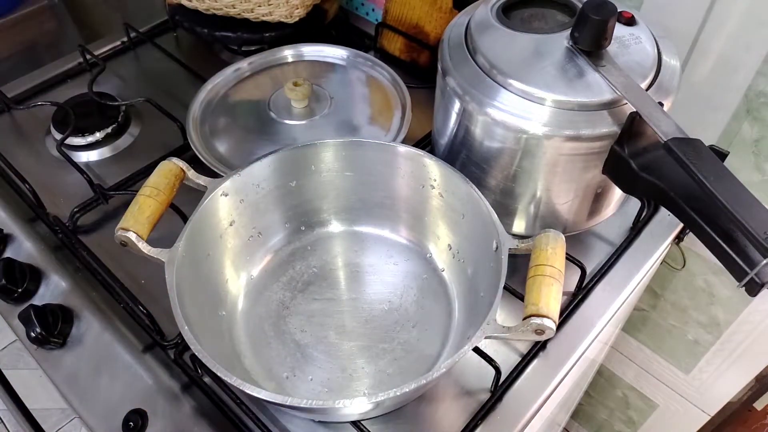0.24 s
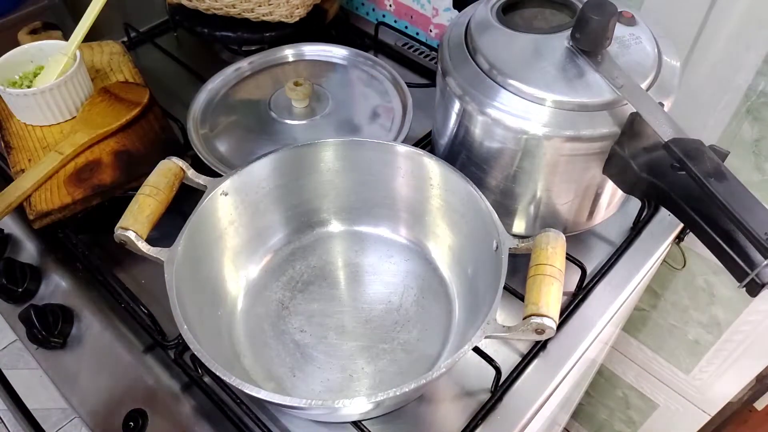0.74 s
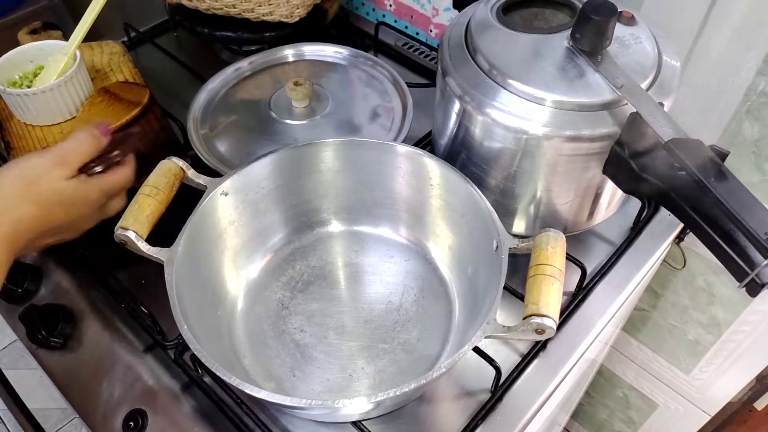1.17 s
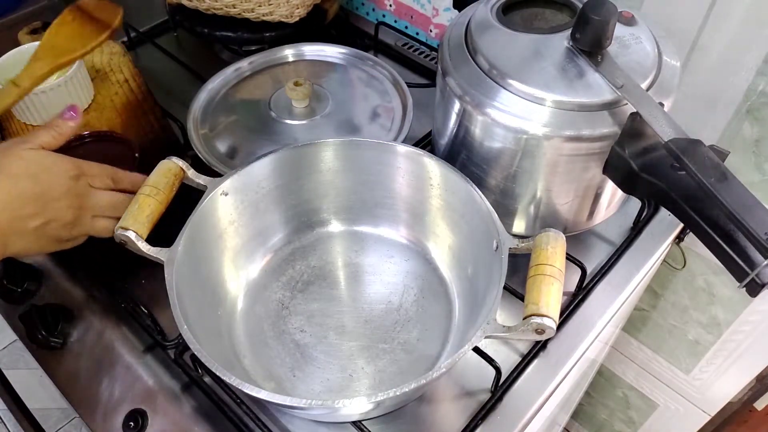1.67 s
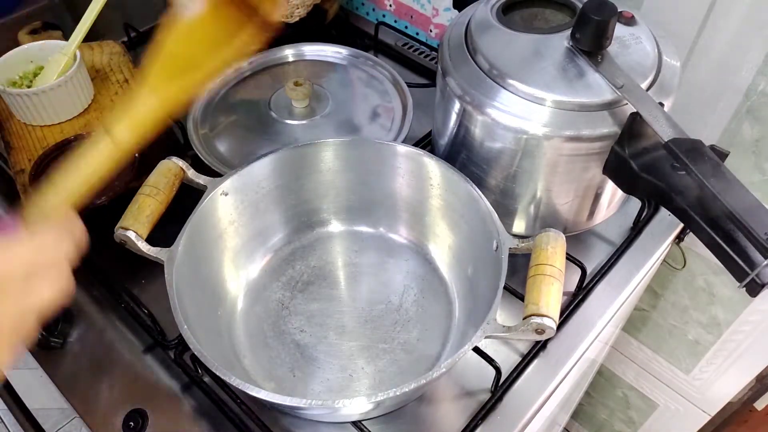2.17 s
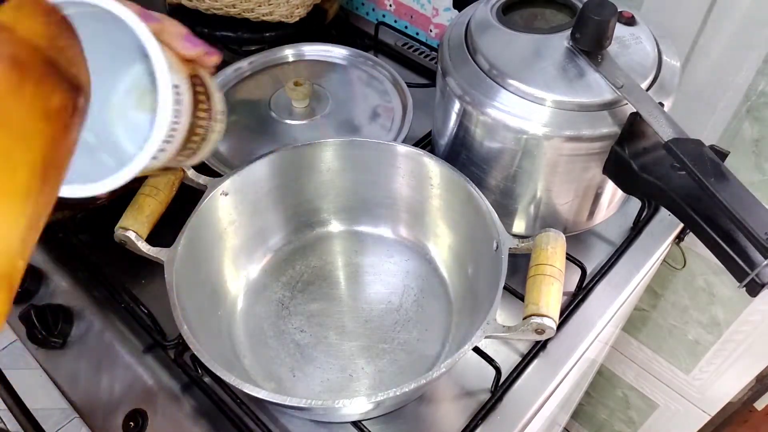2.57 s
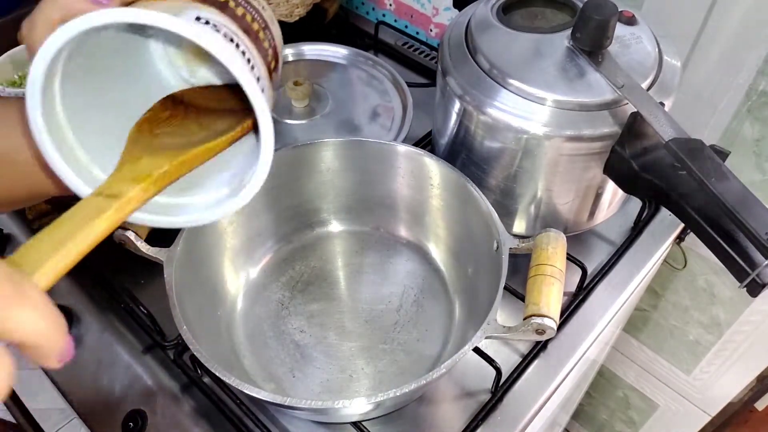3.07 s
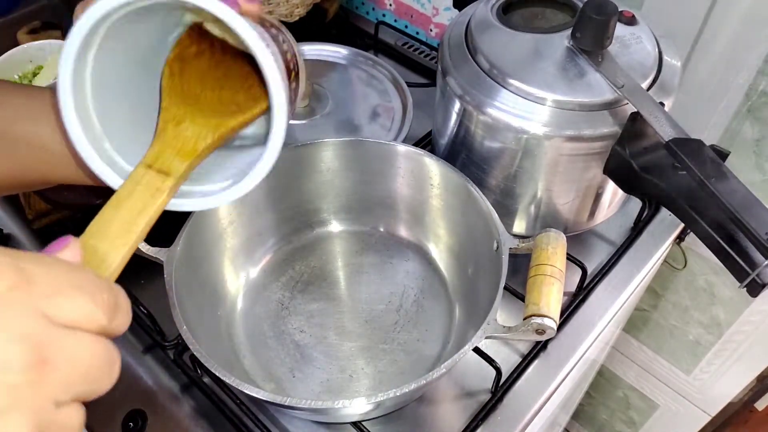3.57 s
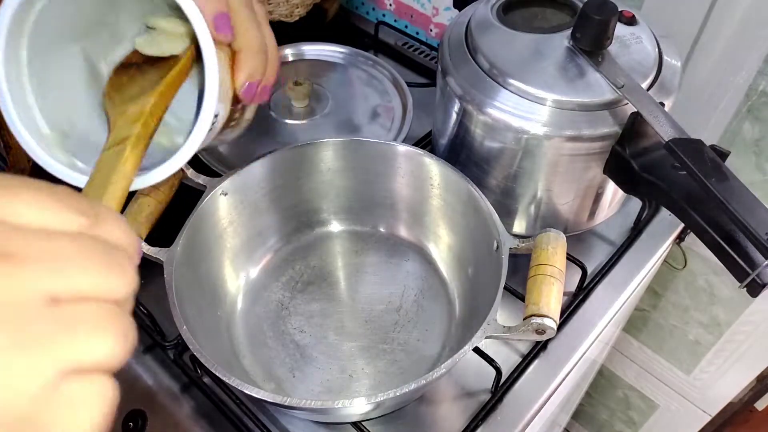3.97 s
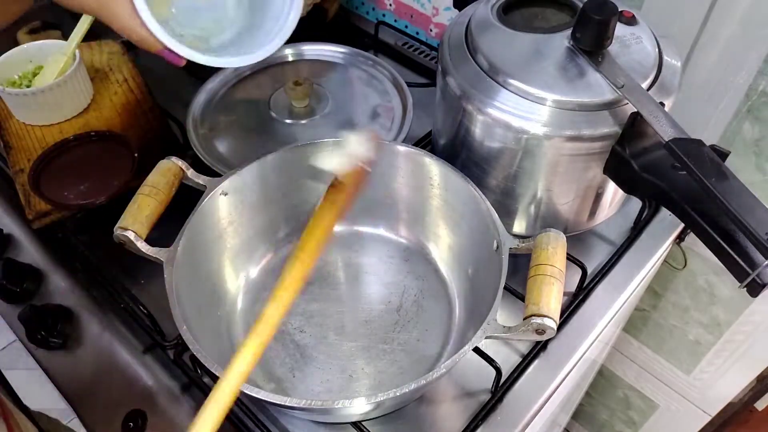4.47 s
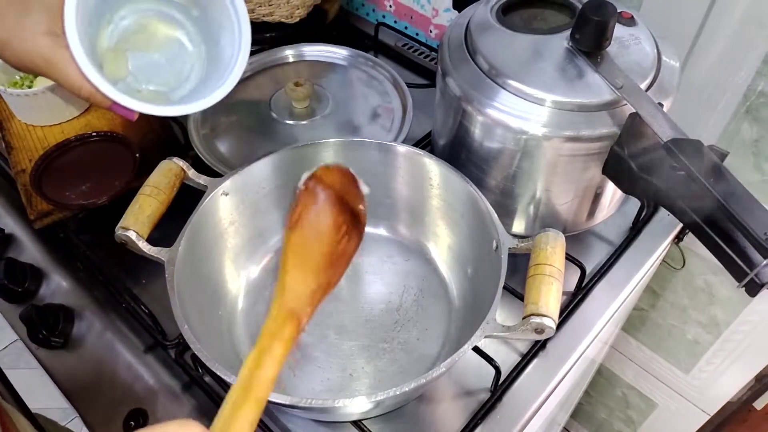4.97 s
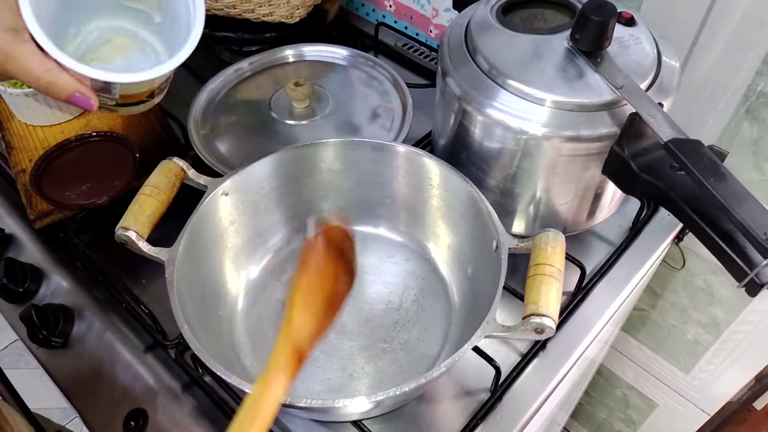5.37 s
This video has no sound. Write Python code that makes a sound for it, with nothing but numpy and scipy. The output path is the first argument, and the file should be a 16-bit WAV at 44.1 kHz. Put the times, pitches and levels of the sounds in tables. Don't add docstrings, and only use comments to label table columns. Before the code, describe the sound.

Steam roars from a cooker vent, drops out briefly, resumes quieter, with dull wooden scuffs and hollow spoon taps on a tub close by.

```python
import sys
import numpy as np
from scipy import signal
from scipy.fft import rfft, irfft, next_fast_len
from scipy.io import wavfile
from scipy.ndimage import uniform_filter1d, map_coordinates

SR = 44100
rng = np.random.default_rng(int(sys.argv[2]) if len(sys.argv) > 2 else 0)


def int16_out(signal):
    q = np.round(np.clip(np.atleast_2d(signal).T, -1, 1) * 32767)
    wavfile.write(sys.argv[1], SR, q.astype(np.int16))


def to_linear_factor(level_db):
    exponent = np.asarray(level_db, float) / 20
    return 10 ** exponent


N = 248265
CUT_S, BACK_S = 0.6025, 0.922


def unit(x):
    return x / np.sqrt(np.mean(x ** 2) + 1e-20)


def along(points, hz):
    f, v = np.transpose(points)
    return np.interp(np.log(hz + 1), np.log(f + 1), v)


def curve(points):
    s, v = np.transpose(points)
    return np.interp(np.arange(N) / SR, s, v)


def wobble(rate_hz):
    knots = rng.standard_normal(int(N * rate_hz / SR) + 4)
    return map_coordinates(knots, [np.arange(N) * rate_hz / SR])


def filtered(x, response):
    m = next_fast_len(x.shape[-1] + 8192)
    spectrum = rfft(x, m) * response(np.fft.rfftfreq(m, 1 / SR))
    return irfft(spectrum, m)[..., :x.shape[-1]]


def resonance(centre_hz, width_hz):
    return lambda f: 1j * f * width_hz / (centre_hz ** 2 - f * f + 1j * f * width_hz)


def pair(alike):
    turn = lambda hz: np.arccos(np.clip(along(alike, hz), -1, 1)) / 2
    split = lambda hz: np.array([np.cos(turn(hz)), np.sin(turn(hz))])
    mid, side = filtered(rng.standard_normal((2, N)), split)
    return np.array([mid + side, mid - side])


def patchy(x, patchy_db, size):
    z = signal.stft(x, nperseg=1024)[2]
    field = rng.standard_normal(z.shape) + 0.34 * rng.standard_normal(z.shape[1:])
    field = uniform_filter1d(field, size=size[0], axis=1)
    field = uniform_filter1d(field, size=size[1], axis=2)
    return signal.istft(z * to_linear_factor(patchy_db * unit(field)), nperseg=1024)[1][:, :N]


def kitchen(x, wet_db):
    # f/Hz, t60/s
    room_t60 = [(150, 0.2), (700, 0.35), (3000, 0.28)]
    hz, t, z = signal.stft(rng.standard_normal((2, len(x))), SR, nperseg=256)
    decay = to_linear_factor(-60 * t / along(room_t60, hz)[:, None])
    tail = signal.istft(z * decay, SR, nperseg=256)[1]
    tail = tail / np.linalg.norm(tail[0])
    late = signal.fftconvolve(np.pad(x, (350, 0))[None], tail, axes=1)
    return to_linear_factor(wet_db) * late[:, :len(x)]


def stove():
    # f/Hz, density/dB per Hz
    flame = [(180, -25), (300, -5.5), (394, -12), (533, -7.5), (561, -10), (1200, -7), (1560, -3.5),
             (2640, -120)]
    # f/Hz, density/dB per Hz
    worktop = [(15, -45), (25, -13), (45, -11.5), (80, -9), (129, -12.5), (190, -13.5), (220, -12.5),
               (290, -37.5), (480, -120)]
    # f/Hz, width/Hz
    panels = [(127, 26), (250, 40)]
    # t of peak/s, peak/dB, f/Hz, swell/s, shaking/dB
    jolts = [(0.049, -60, 124.3, 0.061, -65), (0.459, -63, 237, .03, -63), (.56, -56, 132.7, 0.053, -76.5),
             (.95, -55, 131, 0.023, -72), (0.969, -50.5, 218.6, 0.038, -77), (1.16, -51.5, 253, 0.064, -79),
             (1.68, -49.5, 252, 0.058, -74), (1.7, -50.5, 181, 0.054, -77),
             (1.741, -48.5, 128.8, 0.062, -65), (2.021, -49.5, 118.5, 0.042, -70),
             (2.14, -56, 111, 0.049, -74), (3.171, -55.5, 125.4, 0.071, -66), (3.28, -51, 241, 0.034, -78),
             (3.41, -49.5, 117, 0.092, -62), (3.56, -50, 113, 0.057, -59), (3.77, -47.5, 102, 0.052, -54),
             (4.14, -54.5, 177, 0.079, -71), (4.159, -56, 85, .05, -66), (4.651, -59.5, 124, .05, -79),
             (4.719, -60, 252, 0.025, -75), (4.85, -63, 126, 0.026, -71), (4.9, -66, 80, 0.14, -81),
             (5.3, -63.5, 78, .12, -73)]
    panel_db, unsteady_db = (-65, -68), 3.5
    t = np.arange(N) / SR
    burner = filtered(pair([(300, 0.77), (1000, 0.1)]), lambda hz: to_linear_factor(along(flame, hz)))
    out = to_linear_factor(-58.5) * unit(burner)
    shaking = to_linear_factor(-71 + unsteady_db * wobble(11))
    for s, db, hz, swell_s, shake_db in jolts:
        u = np.clip(1 + (t - s) / swell_s, 0, None)
        swell = u * np.exp(1 - u)
        shaking = shaking + to_linear_factor(shake_db) * swell
        out = out + to_linear_factor(db + 1) * swell * np.sin(2 * np.pi * hz * (t - s) + 0.48 * wobble(13))
    tremor = filtered(pair([(30, 0.94), (150, 0.81)]), lambda hz: to_linear_factor(along(worktop, hz)))
    out = out + shaking * unit(tremor)
    for db, (hz, width_hz) in zip(panel_db, panels):
        song = unit(filtered(pair([(100, 0.89)]), lambda f: resonance(hz, width_hz)(f) ** 2))
        out = out + to_linear_factor(db + unsteady_db * wobble(14)) * song
    return out


def board():
    # t/s, peak/dB, f/Hz, width/Hz, t60/s
    scuffs = [(0.922, -33, 524, 200, 0.15), (.938, -38.5, 330, 150, .15), (.935, -38, 214, 60, 0.28),
              (1.461, -48, 646, 450, 0.27), (1.605, -39, 730, 400, 0.37), (1.618, -28, 1140, 480, 0.065),
              (1.632, -34.5, 760, 764, 0.44), (1.635, -49, 220, 120, 0.95), (1.809, -42.5, 610, 400, 0.52),
              (1.812, -37, 1930, 300, 0.1), (2.09, -47, 765, 203, 0.11), (2.6, -51.5, 580, 150, 0.41),
              (2.975, -36.5, 420, 250, 0.28), (3.79, -48, 750, 300, 0.12), (4.284, -40, 696, 194, 0.064),
              (4.299, -33, 715, 250, 0.074), (4.318, -28, 580, 350, 0.029), (4.357, -42, 597, 350, 0.13),
              (4.44, -58, 390, 150, 0.48), (.4, -60, 376, 200, 0.7)]
    out, t = np.zeros((2, N + SR)), np.arange(SR // 2) / SR
    attack = 1 - np.exp(-t / 0.002)
    for s, db, hz, width_hz, t60 in scuffs:
        mode = resonance(hz, 1.3 * width_hz)
        grit = filtered(rng.standard_normal(len(t)), lambda f: mode(f) ** 3)
        scuff = to_linear_factor(db - 1.5 - 60 * t / t60) * unit(grit) * attack
        heard = scuff * to_linear_factor([[1.5], [-2.5]]) + kitchen(scuff, wet_db=-4.0)
        out[:, round(s * SR):][:, :len(t)] += heard
    return out[:, :N]


def tub():
    # t/s, peak/dB, f/Hz, edge-on (click over thud)/dB, t60/s
    knocks = [
        (2.926, -31.5, 666, -20, 0.092),
        (2.9729, -13.5, 650, 23, 0.016),
        (3.014, -31, 630, 6, 0.041),
        (3.056, -18, 710, -4, 0.023),
        (3.197, -12.5, 694, -13.5, 0.025),
        (3.493, -30, 720, -7, 0.035),
        (3.535, -16.5, 679, 30, 0.038),
        (3.754, -22, 590, -21, 0.0084),
        (3.7865, -19, 610, -13, 0.0091),
        (4.319, -26.5, 610, -5, 0.029),
    ]
    side_db = -27.5
    out, t = np.zeros((2, N + SR)), np.arange(SR // 2) / SR
    attack = 1 - np.exp(-t / 0.0014)
    ring = lambda hz, t60: np.sin(2 * np.pi * hz * t) * to_linear_factor(-60 * t / t60) * attack
    thud = ring(535, 0.045) + ring(195, 0.042)
    click = ring(1630, 0.019) + ring(1910, 0.016) + 0.7 * ring(2900, 0.011)
    for s, db, hz, edge_db, t60 in knocks:
        air = ring(hz, t60) + 0.082 * ring(1.138 * hz, 0.039)
        blow = air + to_linear_factor(side_db - edge_db / 2) * thud + to_linear_factor(side_db + edge_db / 2) * click
        blow = to_linear_factor(db + 4.0) * blow
        heard = blow * to_linear_factor([[-0.8], [0.8]]) + kitchen(blow, wet_db=-4.5)
        out[:, round(s * SR):][:, :len(t)] += heard
    return out[:, :N]


def whistles():
    # t start/s, t end/s, f/Hz, left level/dB, right level/dB
    tones = [(-.06, .27, 6470, -28, -30), (-.08, .4, 3520, -33, -32), (.28, .68, 14550, -18.5, -29),
             (.86, 1.17, 7080, -43.5, -52), (1.856, 2.062, 8780, -32, -53), (2.443, 2.973, 10860, -33, -57),
             (2.66, 3.03, 5420, -42, -48), (4.4, 4.9, 7900, -48, -42), (4.866, 5.7, 6190, -37.5, -53),
             (4.72, 5.7, 3370, -40.5, -61), (4.85, 5.55, 13860, -30.5, -53)]
    breadth = (0.059, 0.028)
    t, out = np.arange(N) / SR, 0
    for start, end, hz, left_db, right_db in tones:
        swell = np.clip(np.minimum(t - start, end - t) / 0.09, 0, 1) ** 2
        mode = resonance(hz, hz * breadth[start > CUT_S])
        breathy = unit(filtered(pair([(5000, 1.0)]), lambda f: mode(f) ** 2))
        out = out + to_linear_factor([[left_db], [right_db]]) * swell * breathy
    return out


def paths(hz, lag_ms):
    # left delay/ms, right delay/ms, left level/dB, right level/dB
    mirrors = [
        (1.09, 1.08, -17.5, -21),
        (.66, 0.39, -32.5, -24.5),
        (1.46, 1.9, -24.5, -30.5),
        (3.2, 3.2, -25.5, -13),
    ]
    # f/Hz, left minus right/dB
    lean = [(60, -7.5), (110, 1.5), (200, 14), (380, 26.5), (700, 6), (1290, 3.5), (2380, 0.5), (4400, 1),
            (8120, 0.5), (15000, 3.5)]
    total = 1
    for left_ms, right_ms, left_db, right_db in mirrors:
        delay = np.exp(-2j * np.pi * hz * [[left_ms], [right_ms]] / 1000)
        total = total + to_linear_factor([[left_db], [right_db]]) * delay
    lag = np.exp(-1j * np.pi * hz * [[lag_ms], [-lag_ms]] / 1000)
    return total * lag * to_linear_factor(along(lean, hz) * [[0.5], [-0.5]])


def steam():
    # f/Hz, density/dB per Hz
    roar = [(530, -39), (900, -26.5), (1240, -23.5), (1500, -16.5), (1970, -17), (2140, -14.5),
            (2390, -3.5), (2590, -7.5), (2790, -0.5), (3020, -3.5), (3470, -1.5), (4050, -3.5), (5200, -13),
            (6760, -39), (11400, -120)]
    # f/Hz, density/dB per Hz
    hiss = [(2880, -45), (4900, -15), (6190, -8.5), (6730, -8.5), (7170, -4.5), (7780, -3.5), (9550, -7.5),
            (11200, 0.5), (13000, -0.5), (15200, -10), (15700, -6.5)]
    # f/Hz, left-right likeness
    alike = [(1000, 0.38), (2000, 0.56), (3200, 0.78), (4100, 0.14), (5200, 0.37), (6800, 0.18),
             (11000, 0.1)]
    # low edge/Hz, high edge/Hz
    edges_hz = [(900, 2200), (2200, 5000), (5000, 9500), (9500, 17000)]
    # level before cut/dB, level after/dB, growth with flow/dB per dB, own drift/dB
    layers = [
        (-43, -59, .1, -1.2),
        (-28.3, -42, 0.4, 0.6),
        (-24, -36.5, 0.4, 0.76),
        (-17.5, -30.3, 0.85, 1.1),
    ]
    # t/s, level/dB
    flow = [
        [(0.0, -17), (0.532, -14.5), (0.6, -17.5)],
        [(0.93, -28), (1.09, -27), (1.13, -29), (2.0, -29), (2.02, -30), (3.49, -28), (3.97, -28), (4.24, -30),
         (4.31, -24), (4.87, -26.5), (5.0, -24), (5.13, -28.5), (5.43, -23.5), (5.63, -32)],
    ]
    # t/s, left minus right/dB
    sway = [(0, 5.5), (.6, 4), (.93, 4), (1.27, 2.5), (1.53, -0.5), (2.09, 1.5), (2.84, 3.5), (3.14, 2),
            (3.36, 4.5), (3.7, -0.5), (4.25, -0.5), (5.21, -1), (5.63, -1.5)]
    flutter_db = 0.5 * wobble(14) + 0.44 * wobble(45) + 0.12 * wobble(160) + 0.14 * wobble(900)
    ridges = patchy(pair(alike), patchy_db=4.5, size=(2, 14))
    jet = to_linear_factor(flutter_db) * patchy(ridges, patchy_db=1.5, size=(10, 4))
    jet = filtered(jet, lambda hz: paths(hz, lag_ms=0.191))
    out, before = 0, np.arange(N) < BACK_S * SR
    surge_db = curve(np.vstack(flow)) - np.where(before, -16, -28)
    for layer, colour, (lo, hi) in zip(layers, (roar, roar, hiss, hiss), edges_hz):
        db_before, db_after, growth, drift_db = layer
        level_db = np.where(before, db_before, db_after) + growth * surge_db + drift_db * wobble(9)
        ramp = lambda hz, edge: np.clip(0.5 + (hz - edge) / 300, 0, 1)
        band = filtered(jet, lambda hz: to_linear_factor(along(colour, hz)) * (ramp(hz, lo) - ramp(hz, hi)))
        out = out + to_linear_factor(level_db) * band / np.std(band.mean(axis=0))
    return out * to_linear_factor((curve(sway) - 3.5) * [[0.5], [-0.5]])


def scene():
    return stove() + board() + tub() + whistles() + steam()


def joined(x):
    # t/s, f/Hz
    shared_from = [(0, 6890), (.56, 6890), (.58, 17000), (1.45, 17000), (1.55, 11500), (1.7, 8600),
                   (1.9, 6890)]
    # t/s, rarity/standard deviations
    flip = [(.6, 1.0), (.9, 1.6)]
    size, bins, shift = 2048, 32, 1024 - 291
    window = np.sin(np.pi * (np.arange(size) + 0.5) / size)
    hz, t, z = signal.stft(np.pad(x, ((0, 0), (shift, 0))), SR, window=window, nperseg=size)
    starts, band = np.arange(0, len(hz), bins), np.arange(len(hz)) // bins
    power = np.add.reduceat(abs(z) ** 2, starts, axis=1) + 1e-20
    pan_db = 1.5 * np.round(10 * np.log10(power[0] / power[1]) / 1.5)
    slow_luck = unit(uniform_filter1d(rng.standard_normal(pan_db.shape), size=9, axis=1))
    luck = 0.54 * slow_luck + rng.standard_normal(pan_db.shape)
    sign = np.where(luck > np.interp(t, *np.transpose(flip)), -1, 1)
    both = z.sum(axis=0)
    shared = np.add.reduceat(abs(both) ** 2, starts) + 1e-20
    left = both * np.sqrt(power[0] / shared)[band]
    right = left * (to_linear_factor(-pan_db) * sign)[band]
    on = band[:, None] * bins * hz[1] >= np.interp(t - shift / SR, *np.transpose(shared_from))
    z = np.where(on, [left, right], z) * (hz < 15750)[:, None]
    return signal.istft(z, window=window, nperseg=size)[1][:, shift:shift + N]


def band_limit(x):
    return signal.sosfilt(signal.butter(12, 16100, fs=SR, output="sos"), x)


def record(dry):
    smear_db, smear_s = -38, 0.014
    t = np.arange(N) / SR
    after = np.clip(t - CUT_S, 0, 1)
    fall_db = smear_db * (1 - np.exp(-after / 0.0012)) - 700 * after
    fall_db = fall_db - 6000 * np.clip(after - smear_s, 0, 1)
    loud = joined(dry) * np.where(t < BACK_S, to_linear_factor(fall_db), 1)
    rounded = loud / (1 + abs(loud / 0.97) ** 6) ** (1 / 6)
    return band_limit(rounded)


dry = scene()
out = record(dry)
int16_out(out)
```